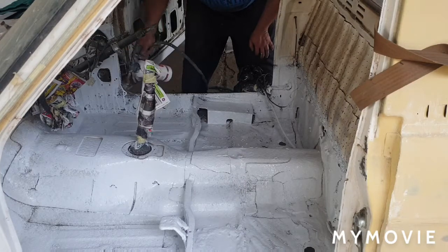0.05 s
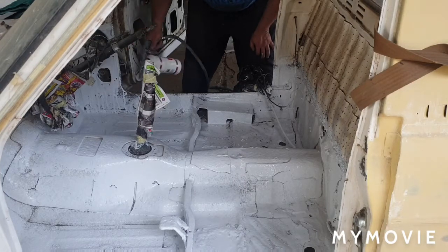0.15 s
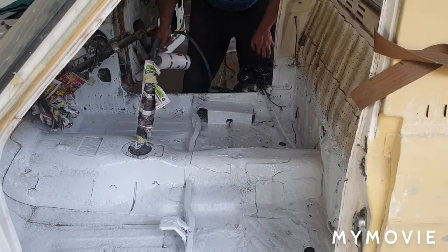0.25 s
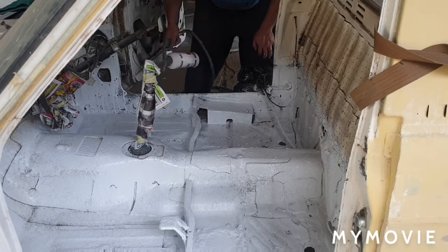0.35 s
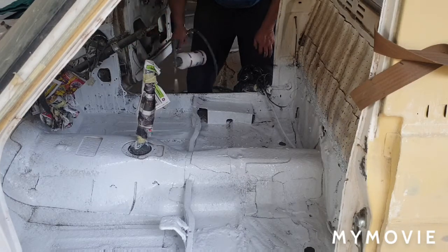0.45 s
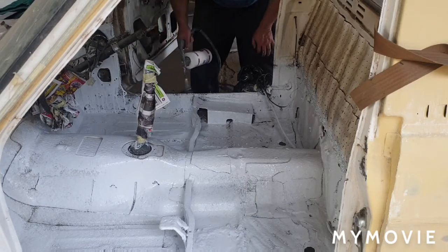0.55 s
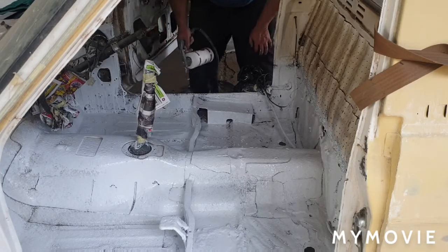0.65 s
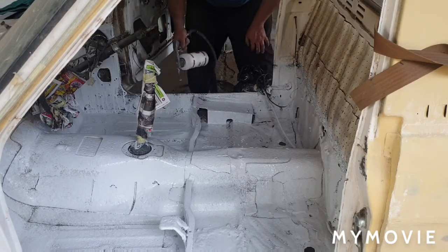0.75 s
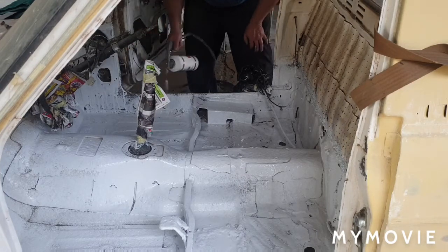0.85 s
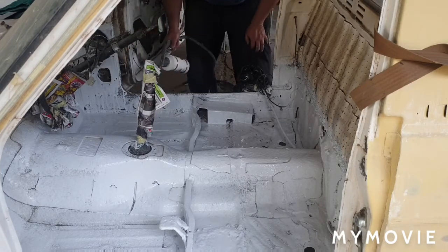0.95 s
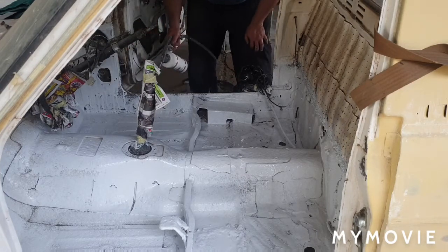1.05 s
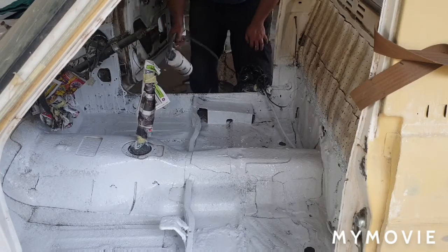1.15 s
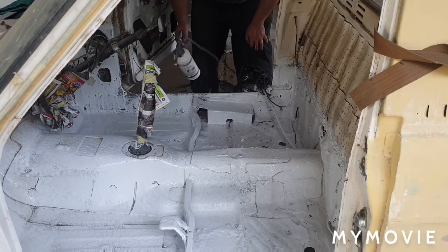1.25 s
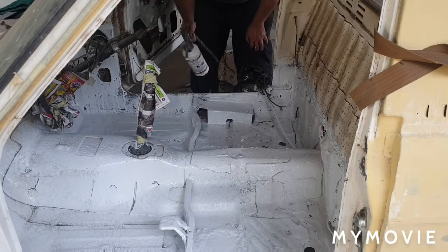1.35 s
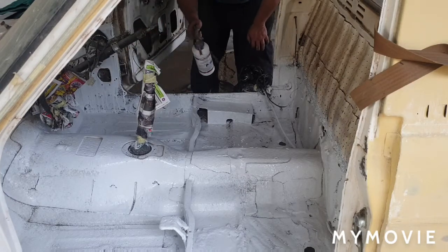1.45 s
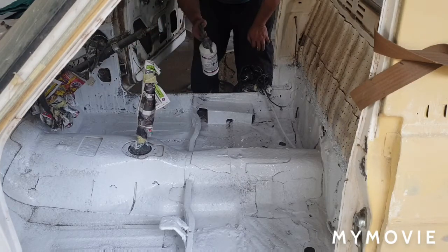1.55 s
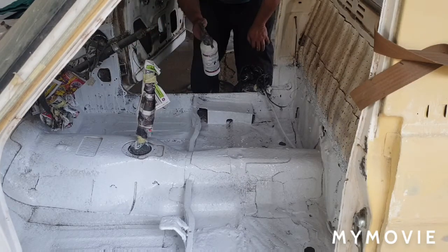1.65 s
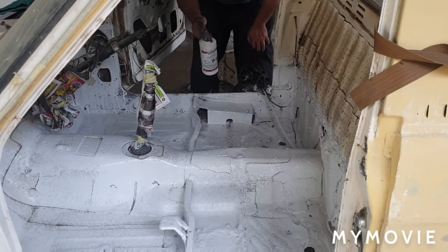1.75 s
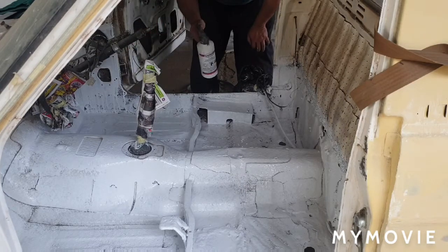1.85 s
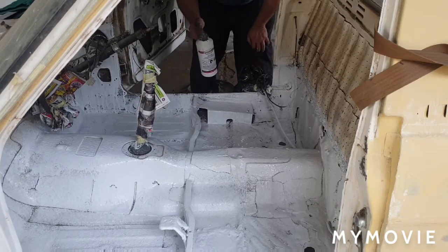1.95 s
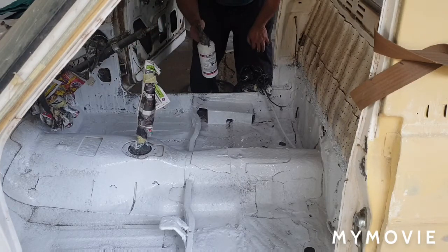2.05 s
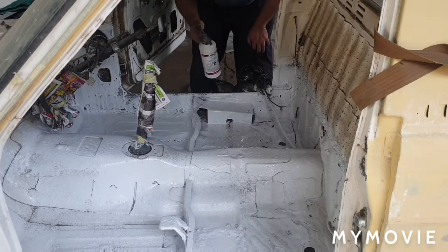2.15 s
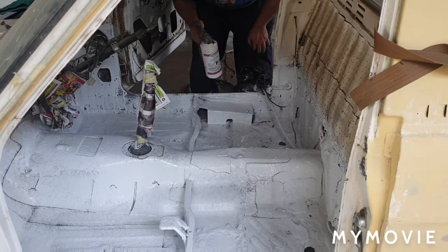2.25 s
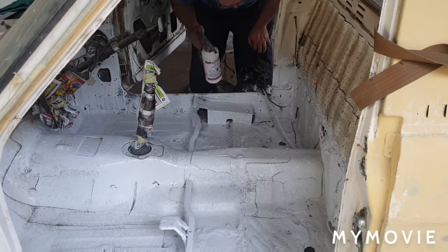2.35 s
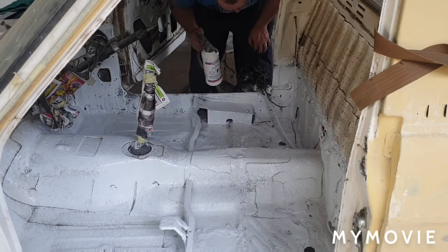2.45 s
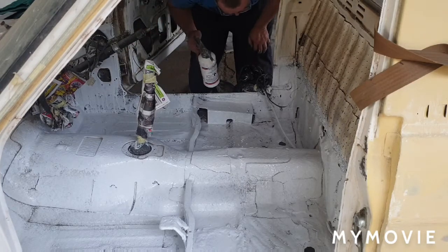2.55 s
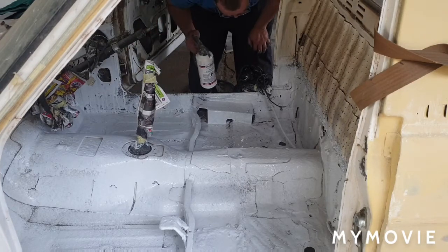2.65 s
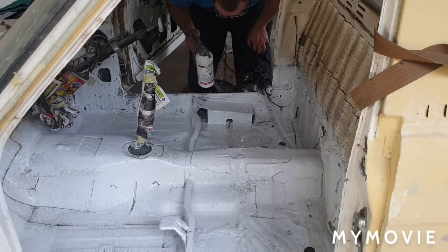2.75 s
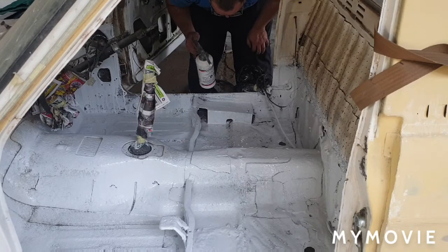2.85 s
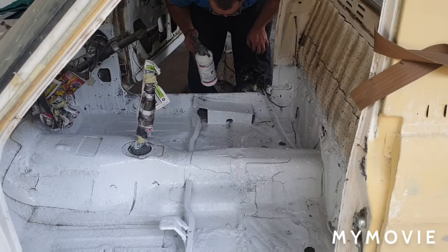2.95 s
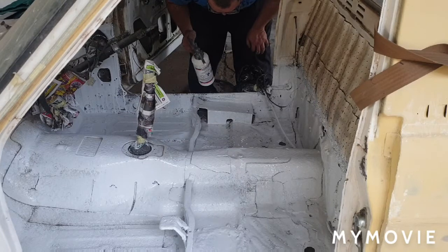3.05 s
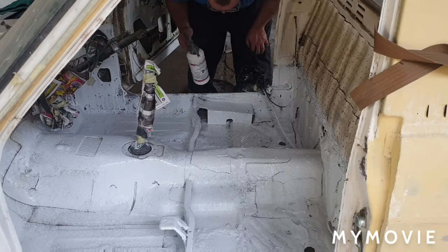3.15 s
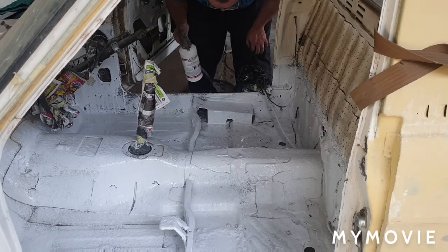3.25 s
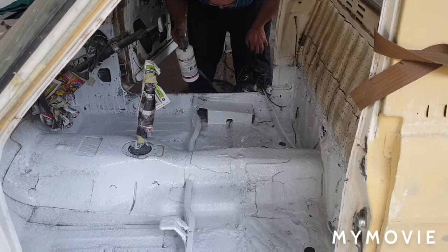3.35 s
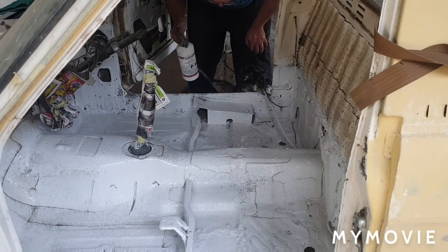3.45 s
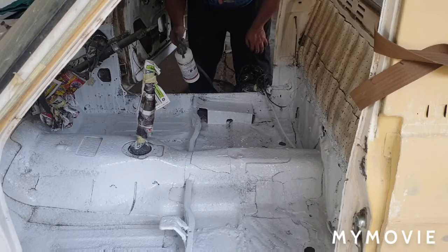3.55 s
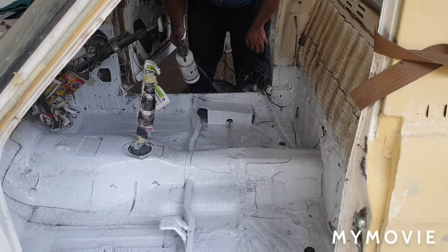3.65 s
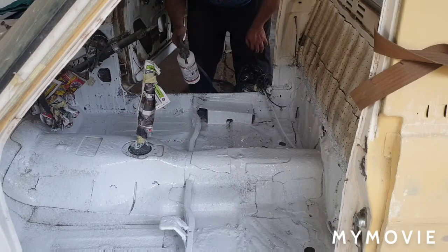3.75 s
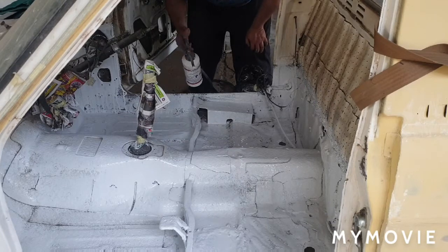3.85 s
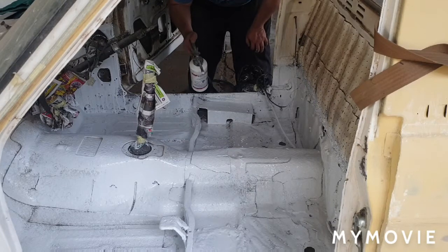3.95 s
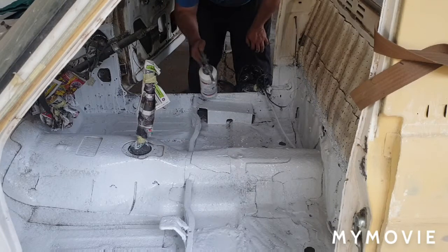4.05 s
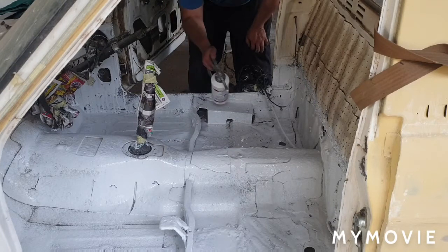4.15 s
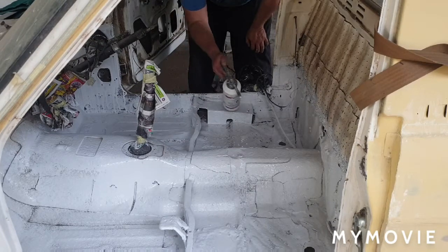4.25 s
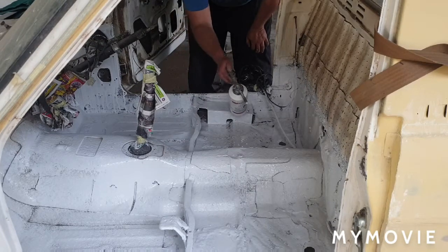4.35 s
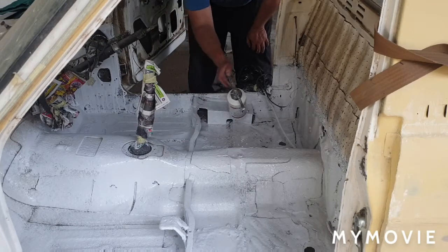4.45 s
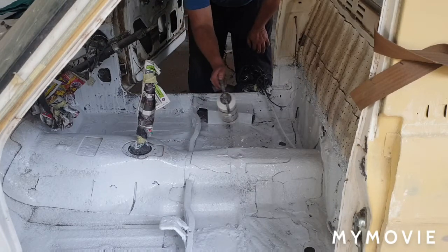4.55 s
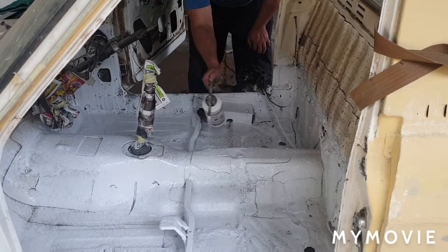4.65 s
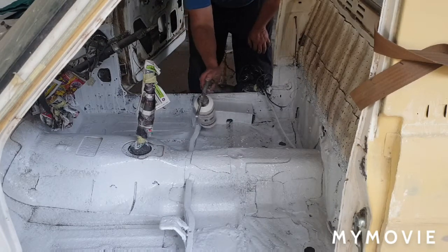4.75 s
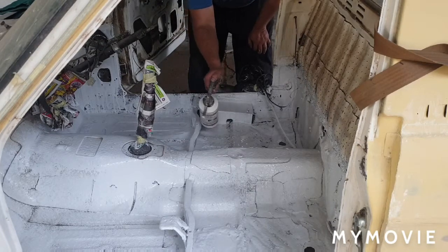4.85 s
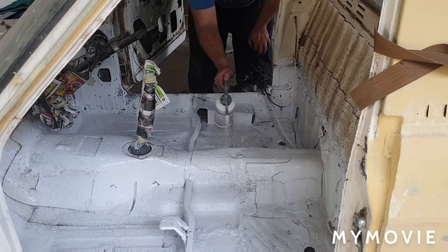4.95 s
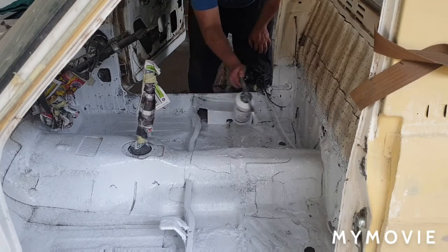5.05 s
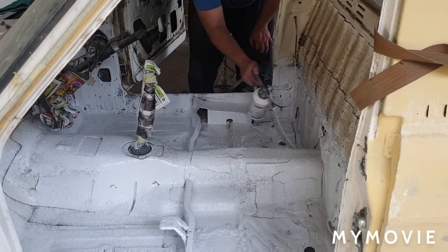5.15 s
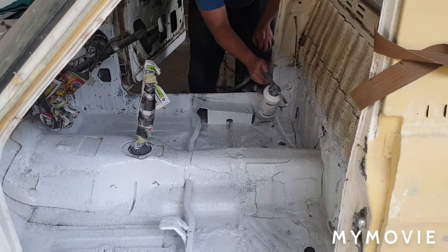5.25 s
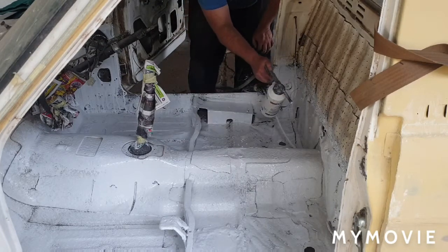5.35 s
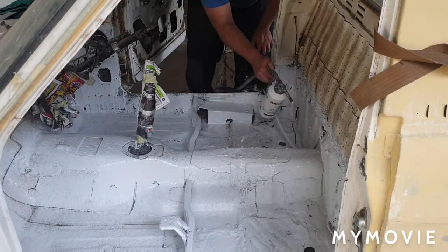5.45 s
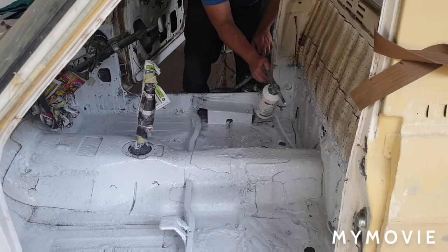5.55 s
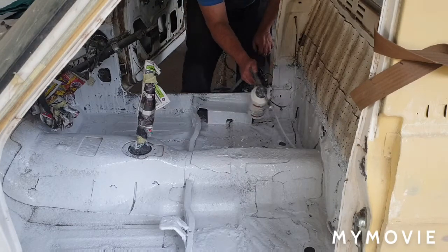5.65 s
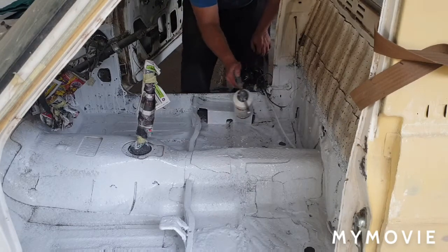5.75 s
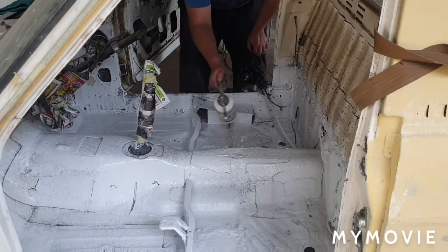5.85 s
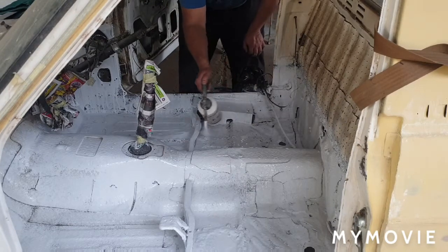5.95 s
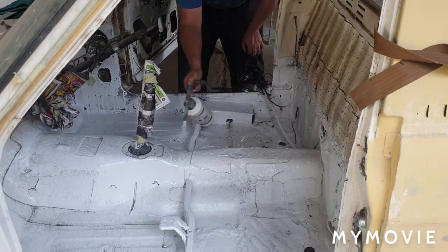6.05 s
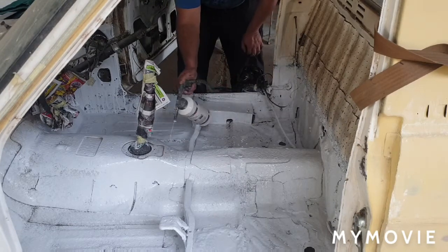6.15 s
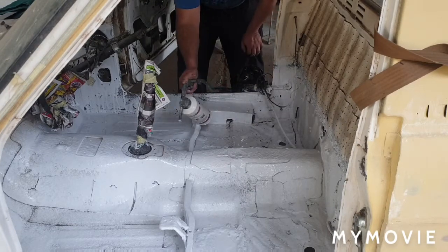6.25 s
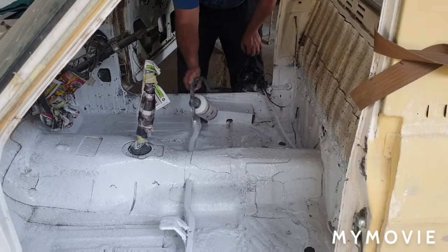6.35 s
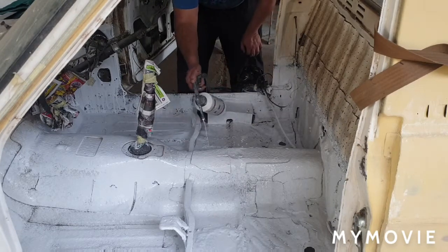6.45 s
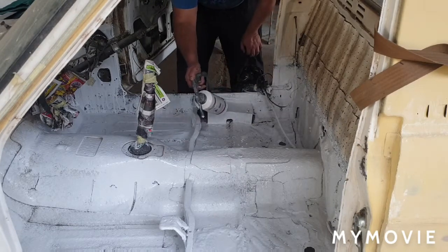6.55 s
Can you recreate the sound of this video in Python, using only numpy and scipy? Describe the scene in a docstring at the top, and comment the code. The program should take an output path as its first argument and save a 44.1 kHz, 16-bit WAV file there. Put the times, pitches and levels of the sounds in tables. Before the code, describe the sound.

Short hisses of aerosol paint on metal and light clinks of the can's mixing ball, with a squeaky fan humming in a workshop.

```python
"""An aerosol can sprays primer onto the steel floor of a stripped car, six short hissing bursts heard
from a camera microphone in the workshop. Between them the mixing ball rolls against the can wall, and
the painter brushes the body shell. Behind, a fan drones and chirps once a turn, a low hum comes and goes,
and birds twitter far off. In the long pause the camera's gain control lifts the whole room,
until the next burst pushes it down."""
import sys
import numpy as np
from scipy import signal
from scipy.fft import rfft, irfft, next_fast_len
from scipy.io import wavfile
from scipy.ndimage import uniform_filter1d, minimum_filter1d, map_coordinates

SR = 44100
rng = np.random.default_rng(int(sys.argv[2]) if len(sys.argv) > 2 else 0)


def generate_wav(signal):
    """Clip the signal to [-1, 1] and save it as 16-bit WAV at the path in sys.argv[1]."""
    frames = np.transpose(np.atleast_2d(signal))
    scaled = np.clip(frames, -1, 1) * 32767
    pcm = np.round(scaled).astype(np.int16)
    wavfile.write(sys.argv[1], SR, pcm)


N = 291501
TIME = np.arange(N) / SR

# Presses of the valve. Each row: start, stop and opening time in seconds, hiss level in dB, sizzle and
# splash in dB over the hiss, drift of the hiss and of the sizzle across the stroke in dB.
VALVE_PRESSES = [(0.513, 0.703, 0.016, -32, 7, -11, -5.5, -5),
                 (0.878, 1.069, 0.0088, -31.5, 6.5, -13, -1.5, -0.5),
                 (4.623, 4.82, 0.01, -27.5, 6, -14.5, 1, 0),
                 (5.032, 5.24, 0.0074, -25, 3.5, -16.5, -0.5, -1),
                 (6.042, 6.209, 0.004, -29.5, 4.5, -14, -2, 0.5),
                 (6.376, 6.535, 0.014, -27, 3, -14.5, -3.5, -6)]
# The jet at the nozzle. Each row: frequency in Hz, relative noise density in dB.
JET_SPECTRUM = [(1500, -34), (2400, -10.5), (3250, -4.5), (3900, -7), (5100, -2.5), (5500, -4),
                (6300, -1.5), (7000, -3), (7700, -7.5), (9400, -6), (10700, 1), (11500, 1.5), (13300, 0.5),
                (15600, 1)]
# Paint landing on steel. Each row: frequency in Hz, relative noise density in dB.
SPLASH_SPECTRUM = [(150, -19), (400, -7.5), (800, -4), (1300, 1.5), (2200, 1), (2700, -17), (3400, -20)]
# The ball meets the can. Each row: start in seconds, relative level in dB, roll decay time in seconds.
BALL_HITS = [(1.213, -52, 0.023), (1.396, -47.5, 0.055), (1.49, -52, 0.053), (1.655, -56, 0.022),
             (1.908, -51.5, 0.0087), (2.429, -52.5, 0.065), (3.174, -53, 0.024), (3.279, -51.5, 0.042),
             (3.614, -53, 0.028), (3.67, -59.5, 0.016), (3.704, -56, 0.019), (5.395, -50, 0.016)]
# The ring of the can wall. Each row: frequency in Hz, relative level in dB, seconds to fall 60 dB.
CAN_MODES = [(1827, -10, 0.16), (1961, 0, 0.14), (2020, -3, 0.12), (2654, -7, 0.21), (3524, -7.5, 0.064),
             (4000, -12.5, 0.066), (4430, -13, 0.094), (4648, -9.5, 0.069), (5560, -19.5, 0.13),
             (6500, -12.5, 0.057), (6670, -25, 0.064), (7090, -40, .08), (9800, -21, 0.035)]
# Shoes and clothes on the floor and shell; the last row, at 6.196 s, is a spit of paint as the valve shuts. #
# Each row: start in seconds, level in dB, length in seconds, band centre in Hz, width in octaves.
PAINTER_RUBS = [(2.121, -55, 0.011, 3140, .9), (2.979, -52, 0.025, 1780, 0.67),
                (4.224, -60, 0.055, 1840, 0.22), (5.682, -50.5, 0.055, 1150, 1),
                (5.714, -48, 0.062, 606, 1), (6.176, -48, 0.076, 93.5, 0.93),
                (6.196, -37.5, 0.019, 1010, 0.2)]
# Air moved by the fan. Each row: frequency in Hz, relative noise density in dB.
AIR_SPECTRUM = [(25, -18), (54, -6), (75, -3), (102, -10), (145, -3.5), (224, -12.5), (352, -6),
                (493, -20.5), (600, -11.5), (927, -18.5), (1090, -16.5), (1250, -22.5), (2000, -21),
                (2800, -31), (3640, -41.5)]
# The thin hiss behind the fan. Each row: frequency in Hz, relative noise density in dB.
HISS_SPECTRUM = [(1500, -19), (2500, -21), (3100, -5.5), (3900, 7.5), (4900, -1.5), (6300, 0), (7500, -11),
                 (9500, -10.5), (11000, -3.5), (12500, -3.5), (14500, 2), (16000, 1)]
# The fan's tones. Each row: frequency in Hz, level in dB, rate of phase wobble in Hz.
FAN_TONES = [(139, -68.5, 20), (306.5, -66, 4.3), (354.8, -59.5, 7), (388.4, -74.5, 5.5), (620, -70, 8),
             (884, -71, 4.4), (1061.5, -67.5, 2.9)]
# The shaft's loudest chirps. Each row: time in seconds, level in dB.
SHAFT_SQUEALS = [(.376, -42), (1.161, -50.5), (3.132, -46.5), (3.355, -46.5), (3.545, -51), (4.62, -50),
                 (5.333, -47)]
# The coming and going of the hum. Each row: time in seconds, level in dB.
HUM_LEVELS = [(0, -50), (.14, -45.5), (.33, -53.5), (.47, -46), (.75, -60.5), (1.4, -56.5), (1.65, -79),
              (3.2, -82), (3.55, -53), (4.55, -57), (4.8, -62.5), (6.61, -69)]
# Reverberation of shell and workshop. Each row: frequency in Hz, seconds to fall 60 dB.
SHOP_DECAY = [(200, 0.47), (1500, 0.41), (5000, 0.29), (10000, 0.23), (16000, 0.23)]


def spray(split_hz=8800, sputter_db=1.5, flutter_db=0.56, paint_build_s=0.0058, spit_db=4, spit_s=0.017):
    """Gas and paint tear from the nozzle and splash on steel; the tone drifts as the can turns."""
    upper = lambda hz: 1 / (1 + (split_hz / (hz + 1)) ** 16)
    jet_gain = lambda hz: amp(along(JET_SPECTRUM, hz))
    hiss = noise(lambda hz: jet_gain(hz) * np.sqrt(1 - upper(hz)))
    sizzle = noise(lambda hz: jet_gain(hz) * np.sqrt(upper(hz)))  # beamed ahead of the nozzle
    splash = noise(lambda hz: amp(along(SPLASH_SPECTRUM, hz)))
    flow = amp(sputter_db * wobble(700) + flutter_db * wobble(45))  # the liquid breaks up unevenly
    out = np.zeros(N)
    for start, stop, opening, db, sizzle_db, splash_db, hiss_drift_db, sizzle_drift_db in VALVE_PRESSES:
        stroke = np.interp(TIME, [start, stop], [-.5, .5])
        paint = 1 - np.exp(-np.maximum(TIME - start, 0) / paint_build_s)  # gas first, paint follows
        spit = amp(spit_db * np.exp(-np.abs(TIME - stop) / spit_s))  # coarser drops as the valve shuts
        jet = paint * amp(hiss_drift_db * stroke) * (hiss + amp(splash_db) * spit * splash)
        jet += amp(sizzle_db + sizzle_drift_db * stroke) * sizzle
        burst = amp(db) * flow * jet * gate(start, stop, rise=opening, fall=0.0057)
        for lag_ms in rng.uniform(1.293, 4, size=3):
            burst = panel_echo(burst, lag_ms)
        out += in_shop(burst, wet_db=-5.5)
    return out


def panel_echo(x, lag_ms, strength=0.3, sweep=0.13):
    """One reflection off nearby sheet steel; the moving hand shifts its comb of notches."""
    lag_s = lag_ms / 1000 * (1 + sweep * wobble(6))
    reflection = np.interp(TIME - lag_s, TIME, x)
    return (x + strength * reflection) / np.hypot(1, strength)


def mixing_ball(grain_db=6, scatter_db=1, scrape=0.25):
    """The ball hits the can and rolls on, ringing its thin wall differently at every spot."""
    t = np.arange(SR // 4) / SR
    rasp_band = signal.butter(2, [1500, 7000], "band", fs=SR, output="sos")
    out = np.zeros(N + SR)
    for start, db, roll_s in BALL_HITS:
        grains = rng.standard_normal(len(t)) * amp(grain_db * rng.standard_normal(len(t)))
        contact = grains * np.exp(-t / roll_s)
        ring = sum(amp(mode_db + rng.normal(0, scatter_db) - 60 * t / t60) * np.sin(2 * np.pi * hz * t)
                   for hz, mode_db, t60 in CAN_MODES)
        clink = unit(signal.fftconvolve(contact, ring)[:len(t)])
        rasp = unit(signal.sosfilt(rasp_band, contact))
        out[round(start * SR):][:len(t)] += amp(db - 7.5) * (clink + scrape * rasp)
    return in_shop(out[:N], wet_db=-4)


def painter_scuffs():
    """Shoes and clothes rub the floor and shell, and once paint spits as the valve shuts; each a short band of
    noise with little room on it."""
    out = np.zeros(N)
    for start, db, length, centre_hz, octaves in PAINTER_RUBS:
        rub = noise(lambda hz: 1 / (1 + (np.log2((hz + 1) / centre_hz) / octaves) ** 2) ** 1.85)
        out += amp(db) * rub * gate(start, start + length, rise=0.0058, fall=0.0061)
    return in_shop(out, wet_db=-11)


def fan():
    """The room tone: moving air and the fan's unsteady tones, over a thin hiss."""
    air = amp(-53.5) * noise(lambda hz: amp(along(AIR_SPECTRUM, hz)))
    hiss = amp(-62) * noise(lambda hz: amp(along(HISS_SPECTRUM, hz)))
    tones = sum(amp(db) * np.sqrt(2) * np.sin(2 * np.pi * hz * TIME + 1.28 * wobble(wobble_hz))
                for hz, db, wobble_hz in FAN_TONES)
    return air + hiss + tones


def shaft_squeak(turns_per_s=16.743, level_db=-56.5, pitch_hz=1985, half_s=0.0094, sag_hz_per_s=-1800):
    """The fan's shaft chirps once a turn, sagging in pitch; now and then it squeals harder."""
    times = np.arange(.0215, N / SR, 1 / turns_per_s)
    levels = level_db + 0.5 * rng.standard_normal(len(times))
    events = list(zip(times, levels)) + SHAFT_SQUEALS
    chirps = glides([(s, db, pitch_hz + rng.normal(0, 15), half_s, sag_hz_per_s) for s, db in events])
    slip = 1 + 0.51 * wobble(160)  # the contact slips unevenly
    return in_shop(chirps * slip, wet_db=-10)


def hum(pitch_hz=65, waver_hz=2.38):
    """A low wavering hum comes and goes in the room."""
    phase = 2 * np.pi * np.cumsum(pitch_hz + waver_hz * wobble(11)) / SR
    level_db = np.interp(TIME, *np.transpose(HUM_LEVELS)) + 0.85 * wobble(9.1)
    return amp(level_db) * np.sqrt(2) * np.sin(phase)


def far_birds(level_db=-70, pitch_hz=5200, count=160, half_s=0.009, slope_hz_per_s=40000):
    """Faint scattered twitters, like sparrows outside the door, with plenty of room on them."""
    times = rng.uniform(1, N / SR, count)
    calls = [(s, level_db + 2.9 * size, pitch_hz * np.exp(0.14 * pitch), half_s, slope_hz_per_s * bend)
             for s, (size, pitch, bend) in zip(times, rng.standard_normal((count, 3)))]
    return in_shop(glides(calls), wet_db=-2)


def in_shop(x, wet_db):
    """Direct sound at the microphone, then 2 ms later the shell and workshop, at unchanged power."""
    hz, t, spectra = signal.stft(rng.standard_normal(SR // 3), SR, nperseg=256)
    decay = amp(-60 * t / along(SHOP_DECAY, hz)[:, None])
    tail = signal.istft(spectra * decay, SR, nperseg=256)[1]
    response = np.concatenate([[1], np.zeros(SR // 500), amp(wet_db) * tail / np.linalg.norm(tail)])
    return signal.oaconvolve(x, response / np.linalg.norm(response))[:N]


def gain_control(x, lift_db=8, ceiling_db=-32, hold_s=1.926, recover_s=1, duck_s=0.051):
    """The camera's gain starts low, creeps up after a long quiet spell and ducks at a loud sound."""
    follow = lambda v, s: signal.lfilter([1 / (s * SR)], [1, 1 / (s * SR) - 1], v)
    level_db = 10 * np.log10(follow(x ** 2, .005) + 1e-12)
    hold, ramp = int(hold_s * SR), int(recover_s * SR)
    headroom_db = np.clip(ceiling_db - level_db, 0, lift_db)
    allowed_db = minimum_filter1d(headroom_db, hold, mode="constant", origin=(hold - 1) // 2)
    rising_db = uniform_filter1d(allowed_db, ramp, mode="constant", origin=(ramp - 1) // 2)
    return x * amp(np.minimum(rising_db, follow(allowed_db, duck_s)))


def glides(rows):
    """Soft whistles. Each row: centre in seconds, peak in dB, Hz, half length in seconds, Hz a second."""
    t = np.arange(-SR // 16, SR // 16) / SR
    out = np.zeros(N + SR)
    for centre_s, db, hz, half_s, slope in rows:
        phase = 2 * np.pi * (hz * t + slope * t ** 2 / 2 + rng.random())
        out[round(centre_s * SR):][:len(t)] += amp(db) * np.exp(-(t / half_s) ** 2) * np.sin(phase)
    return out[len(t) // 2:][:N]


def amp(db):
    """Decibels to gain."""
    return 10 ** (np.asarray(db) / 20)


def unit(x):
    """Scale to rms 1."""
    return x / np.sqrt(np.mean(x ** 2) + 1e-20)


def along(points, hz):
    """Read (Hz, value) points on a log frequency axis."""
    knots_hz, values = np.transpose(points)
    return np.interp(np.log(hz + 1), np.log(knots_hz), values)


def wobble(rate):
    """A smooth random curve, rate knots a second."""
    return map_coordinates(rng.standard_normal(int(N * rate / SR) + 4), [TIME * rate])


def filtered(x, response):
    """Shape x by a gain that depends on frequency."""
    size = next_fast_len(N + SR // 4)
    return irfft(rfft(x, size) * response(np.fft.rfftfreq(size, 1 / SR)), size)[:N]


def noise(response):
    """Coloured noise of rms 1."""
    return unit(filtered(rng.standard_normal(N), response))


def gate(start, stop, rise, fall):
    """An envelope that opens at start and dies away after stop."""
    attack = 1 - np.exp(-np.maximum(TIME - start, 0) / rise)
    return attack * np.exp(-np.maximum(TIME - stop, 0) / fall)


def scene():
    """What reaches the microphone: the painter's work in front, workshop and birds behind."""
    return (spray() + mixing_ball() + painter_scuffs() + fan() + shaft_squeak() + far_birds() + hum())[None]


def record(dry):
    """The camera rides the gain of its mono microphone and cuts the highest treble."""
    top_hz = 15850
    band_limit = lambda hz: (1 - np.tanh((hz - top_hz) / 60)) / 2
    return filtered(gain_control(dry[0]), band_limit)[None]


dry = scene()
out = record(dry)
generate_wav(out)
```